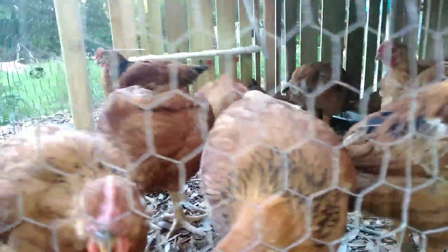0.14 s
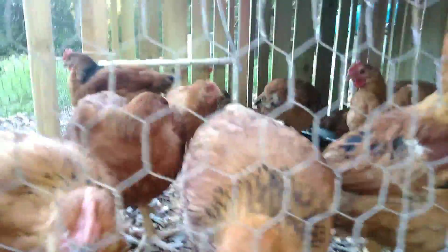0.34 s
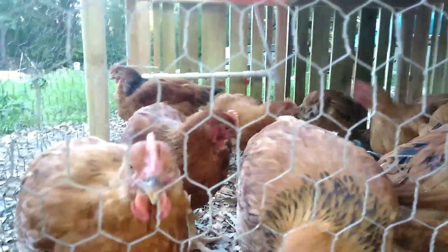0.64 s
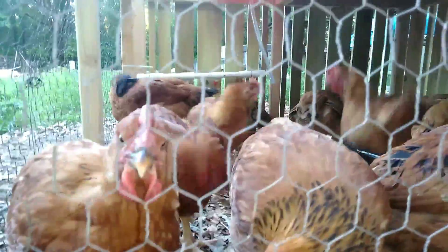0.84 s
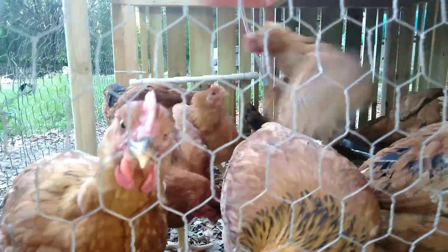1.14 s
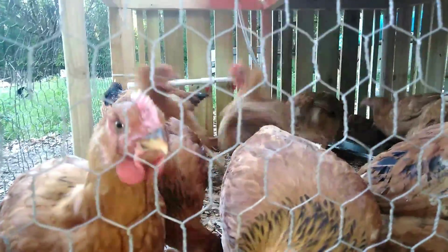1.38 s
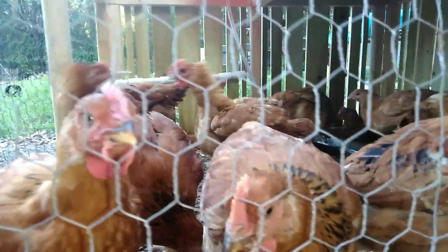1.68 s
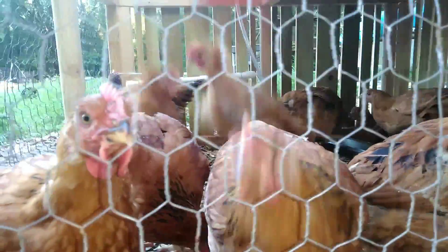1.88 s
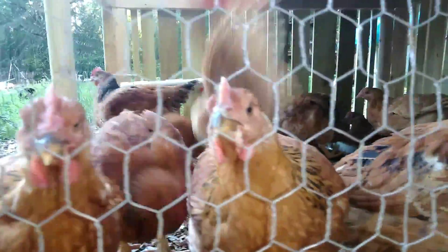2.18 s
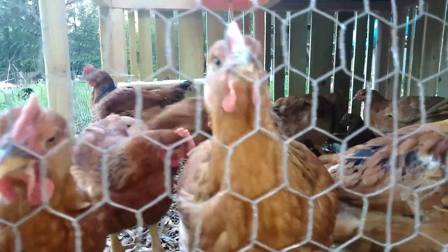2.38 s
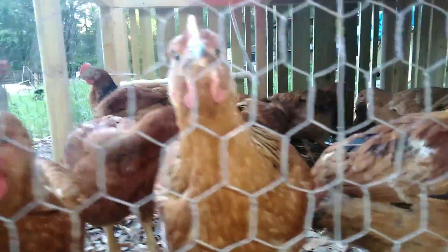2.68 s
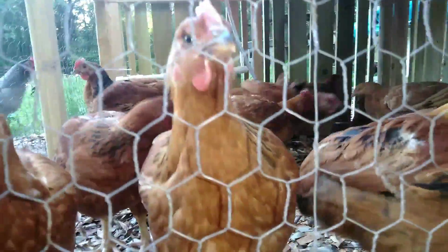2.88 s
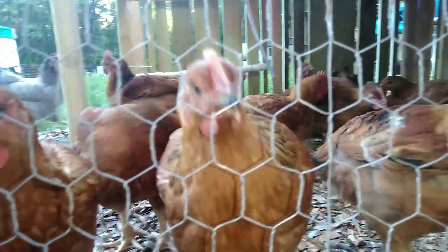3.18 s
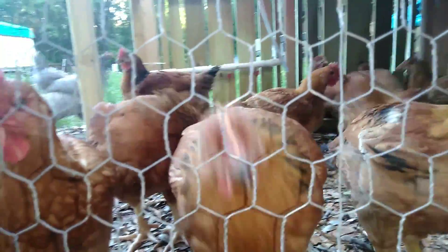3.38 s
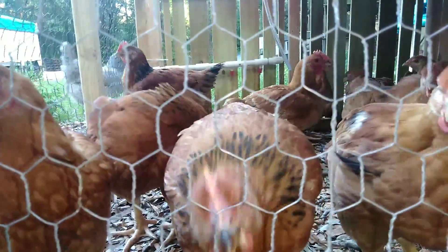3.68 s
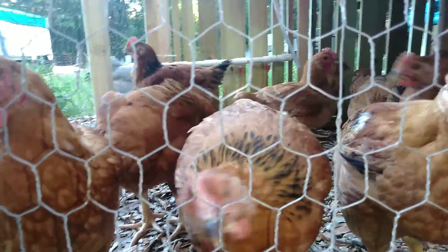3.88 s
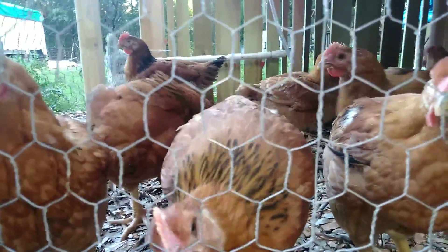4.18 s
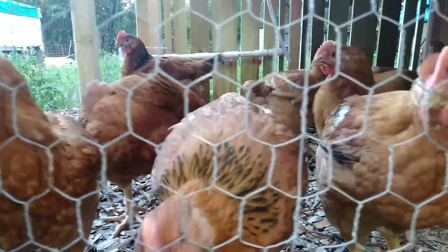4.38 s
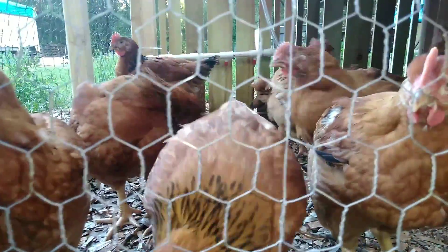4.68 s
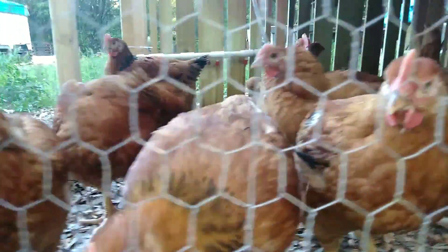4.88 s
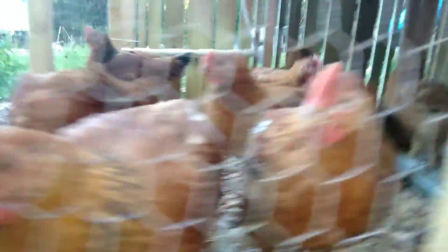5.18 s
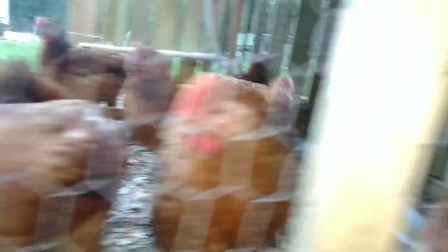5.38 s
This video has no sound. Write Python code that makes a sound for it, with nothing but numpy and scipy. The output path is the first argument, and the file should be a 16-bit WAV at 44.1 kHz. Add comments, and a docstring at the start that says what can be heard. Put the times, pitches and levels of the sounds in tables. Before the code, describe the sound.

From the start, young hens scratch and peck in dry wood chips close to the microphone, making irregular, bright crackles and small snaps. Faint short clucks and thin, gliding peeps come in between, over a quiet distant hum and hiss outdoors. From about 1.2 to 1.5 seconds a bird flaps its wings, with low puffs of air, a loud scatter of chips and soft thuds of feet. The peeps and clucks then grow louder and more frequent. They are loudest from about 2.7 to 3.5 seconds, with brief rough squawks around 3 seconds and another near 4 seconds. Smaller wing puffs come at about 2.3 and 3.3 seconds. Peeping stays busy until it fades near 5 seconds, while scratching and pecking continue to the end, with a soft thud at about 5.5 seconds. The wooden pen adds a very short, slight echo.

```python
"""Young hens in a slatted, wire-fronted pen outdoors, a phone microphone close to the mesh.
From the start, over a distant hum, feet and beaks throw and snap dry wood chips; throats pulse in faint
clucks and whistle thin peeps. Just after 1 s wings push air at the microphone and feet thud on the ground.
The calls grow louder, with a few rough squawks, are loudest around 3 s and fade near 5 s while the
scratching goes on. Slats and roof give the birds a brief echo throughout."""
import sys
import numpy as np
from scipy import signal
from scipy.fft import rfft, irfft
from scipy.io import wavfile
from scipy.ndimage import uniform_filter1d

SR = 44100
rng = np.random.default_rng(int(sys.argv[2]) if len(sys.argv) > 2 else 0)


def inscribe(sig):
    """Save sig as 16-bit PCM at rate SR to the path in sys.argv[1].

    A 1-D sig is mono; a 2-D sig holds one channel per row.
    Samples are clipped to [-1, 1] before scaling.
    """
    pcm = np.round(np.clip(np.atleast_2d(sig).T, -1, 1) * 32767)
    wavfile.write(sys.argv[1], SR, pcm.astype(np.int16))


N = 244314

# distant hum and hiss of the yard: (frequency [Hz], relative level [dB])
YARD_SPECTRUM = [(20, 4.5), (80, 18), (110, 10), (306, -4), (1410, -13), (2920, -9), (4680, -23.5),
                 (6720, -9), (11400, -31.5), (15500, -21.5)]
# bright crackle of chips, sharpened by the microphone's resonance near 11.3 kHz:
# (frequency [Hz], relative level [dB])
CRACKLE_SPECTRUM = [(2500, -34), (4500, -17.5), (7000, -8.5), (9000, -4), (11300, 5), (13000, -3),
                    (15500, -9.5)]
# duller body under that crackle: (frequency [Hz], relative level [dB])
BODY_SPECTRUM = [(120, -25.5), (350, 0), (1000, 5.5), (2500, 7), (4500, 2), (7000, 1.5)]
# the flock shuffling between strokes: (time [s], crackle level [dB])
FLOCK_SHUFFLE = [(0.0, -98), (0.15, -52), (0.37, -68.5), (0.99, -70), (1.39, -80), (1.56, -48), (1.69, -78),
                 (1.77, -45), (1.81, -96), (1.97, -60), (2.1, -47), (2.7, -49.5), (2.95, -43.5), (3.6, -51),
                 (3.64, -64.5), (3.8, -69), (4.2, -52.5), (4.49, -52.5), (4.78, -68), (5.11, -73),
                 (5.42, -80), (5.54, -76)]
# foot scrapes and wing strokes that swell before they peak:
# (peak time [s], crackle level [dB], body against crackle [dB], fall to a tenth [ms])
SCRAPE_STROKES = [(.005, -39, -40, 71), (0.186, -35, -18.5, 24), (0.224, -31.5, -16.5, 13),
                  (1.168, -39, -43, 136), (1.465, -26.5, -13.5, 24), (1.488, -30.5, -7, 21),
                  (1.591, -44, -21, 12), (2.103, -26.5, -18.5, 28), (2.242, -25, -13, 46),
                  (2.281, -23.5, -9, 22), (2.431, -28, -23.5, 17), (2.5, -29, -12, 67),
                  (2.699, -34.5, -8.5, 46), (2.934, -24, -7.5, 41), (3.061, -30, -9, 42),
                  (3.517, -34, -44, 23), (4.517, -30.5, -12.5, 23), (4.691, -40, -32, 21),
                  (4.731, -37.5, -12.5, 69)]
# pecks and kicks that strike the litter at once:
# (peak time [s], crackle level [dB], body against crackle [dB], fall to a tenth [ms])
PECK_STROKES = [(0.262, -33, -17, 58), (0.64, -37, -23, 33), (0.943, -42.5, -6.5, 20),
                (0.981, -33, -18.5, 40), (1.306, -33.5, -12, 240), (1.36, -19.5, -9.5, 28),
                (1.381, -20.5, -15, 12), (1.437, -41, -32, 12), (1.505, -30, -7.5, 22),
                (1.642, -29.5, -6.5, 27.5), (1.701, -33, -3.5, 60), (1.926, -40.5, -15.5, 300),
                (1.97, -34.5, -11, 107), (2.14, -33.5, -12, 88), (2.197, -28.5, -18.5, 65),
                (2.596, -32.5, -24, 27), (2.745, -27, -16, 36), (2.821, -37.5, 7, 210), (2.9, -28, -1, 88),
                (3.224, -34, -29, 13), (3.245, -44, 20.5, 2.8), (3.449, -32.5, -18, 85),
                (3.678, -25, -25, 46), (3.83, -38.5, -7, 44), (3.889, -32.5, -4.5, 42),
                (4.172, -26.5, -18, 25), (4.242, -30.5, -17, 80), (4.798, -34.5, -25, 25),
                (4.922, -45.5, -23, 56), (4.955, -32, -31.5, 23), (4.979, -37, -42.5, 140),
                (5.11, -42.5, -15, 112), (5.345, -37.5, -21, 65), (5.482, -32.5, -21.5, 82)]
# short clucks: (start [s], length [s], pitch [Hz], mouth resonance [Hz], level [dB])
CLUCK_CALLS = [(0.091, 0.024, 581, 1140, -66), (0.288, 0.018, 480, 1000, -62), (0.47, 0.028, 318, 500, -70),
               (0.645, 0.041, 301, 527, -66.5), (1.405, 0.011, 597, 1320, -51.5),
               (1.497, 0.012, 464, 930, -51.5), (1.775, 0.025, 550, 1190, -54.5),
               (2.112, 0.018, 531, 987, -41.5), (2.189, 0.014, 410, 700, -52),
               (2.26, 0.035, 484, 570, -45.5), (2.489, 0.011, 496, 980, -44),
               (2.654, 0.0076, 544, 1020, -53.5), (2.692, 0.012, 558, 1220, -35.5),
               (2.712, 0.0086, 588, 1260, -43), (3.278, 0.0094, 542, 935, -58),
               (3.454, 0.012, 485, 980, -52), (3.834, 0.024, 505, 1920, -50.5),
               (3.888, 0.0048, 487, 590, -54), (4.233, 0.026, 510, 940, -57),
               (4.335, 0.021, 485, 1800, -56), (4.375, 0.026, 763, 820, -66.5),
               (4.664, 0.032, 680, 1400, -56.5), (4.848, 0.015, 463, 720, -52),
               (5.339, 0.016, 536, 1240, -65)]
# drawn-out squawks: (start [s], length [s], pitch [Hz], mouth resonance [Hz], level [dB],
# chest against mouth [dB], rasping edge against mouth [dB], roughness [0-1])
SQUAWK_CALLS = [(1.702, 0.066, 416, 873, -53, -10, -23, 0.3), (2.863, 0.044, 557.5, 1750, -31, 0, -21, 0.6),
                (2.923, 0.054, 554.5, 1480, -58.5, 13, -19, 0.76),
                (3.041, 0.087, 532, 1870, -36, -62, -6, 0.4), (3.923, 0.14, 750, 2295, -36, -59, -28, 0.37)]
# single chips breaking: (time [s], level [dB])
CHIP_SNAPS = [(.2466, -14), (1.3375, -21), (1.3602, -16), (1.644, -19), (2.1031, -19), (3.3382, -24),
              (3.4745, -21), (3.6817, -16), (4.1734, -15), (4.1889, -21), (4.3524, -24), (4.5292, -23),
              (5.344, -23)]
# whistled peeps: (start [s], length [s], first pitch [Hz], middle pitch [Hz], last pitch [Hz], level [dB])
PEEP_CALLS = [(0.385, 0.091, 4120, 2870, 2560, -56), (0.72, 0.057, 2570, 2870, 2380, -60),
              (1.111, 0.077, 3090, 2720, 2470, -62.5), (1.407, 0.039, 1435, 2610, 3450, -44.5),
              (1.497, 0.036, 3210, 2490, 2080, -41), (1.511, 0.034, 1827, 1804, 1775, -40),
              (1.722, 0.061, 3230, 2855, 2020, -40), (2.119, 0.025, 2990, 3880, 4270, -42),
              (2.248, 0.14, 2950, 3850, 3260, -52), (2.383, 0.026, 3240, 2400, 2080, -56),
              (2.49, 0.1, 3600, 3324, 3770, -38), (2.621, 0.12, 3330, 2910, 2580, -50),
              (2.666, 0.059, 4170, 3474, 3450, -33.5), (2.839, 0.035, 4150, 4060, 3920, -37),
              (3.02, 0.08, 2084, 3245, 3480, -35.5), (3.063, 0.1, 2800, 3120, 3000, -39.5),
              (3.291, 0.029, 3860, 3900, 3500, -37.5), (3.319, 0.024, 3250, 2540, 2820, -35.5),
              (3.339, 0.071, 3520, 2520, 2094, -35), (3.46, 0.017, 2580, 3880, 4670, -41),
              (3.469, 0.046, 4510, 2720, 2637, -33.5), (3.651, 0.052, 2220, 2890, 4320, -58),
              (3.744, 0.06, 2830, 2490, 2420, -59.5), (3.844, 0.067, 2245, 2900, 4700, -46.5),
              (3.895, 0.098, 2374, 2364, 2140, -39.5), (4.073, 0.059, 2190, 3880, 4600, -45),
              (4.174, 0.16, 2380, 2320, 2300, -59), (4.272, 0.059, 1760, 3220, 4600, -41.5),
              (4.346, 0.033, 2950, 3210, 2870, -42), (4.379, 0.074, 2430, 2230, 2300, -56.5),
              (4.42, 0.086, 2142, 2486, 1820, -39), (4.483, 0.051, 2435, 3600, 4740, -44),
              (4.573, 0.095, 2510, 2360, 2380, -61), (4.669, 0.043, 2860, 3030, 2300, -39.5),
              (4.699, 0.05, 2700, 3560, 4700, -46.5), (4.883, 0.034, 1660, 1930, 2180, -50),
              (5.072, 0.05, 4520, 3260, 2960, -60), (5.274, 0.083, 3090, 2370, 2290, -56.5),
              (5.421, 0.033, 2840, 2550, 2170, -60.5)]
# air pushed at the microphone by wings: (time [s], level [dB])
WING_PUFFS = [(1.171, -49), (1.229, -44.5), (1.272, -39), (1.31, -52), (1.349, -31.5), (1.451, -42),
              (2.271, -40), (3.323, -39.5), (3.459, -45.5)]
# feet and bodies meeting the ground: (time [s], level [dB])
GROUND_THUDS = [(1.279, -48.5), (1.311, -50), (1.365, -49), (1.709, -45.5), (1.751, -44), (1.968, -50.5),
                (2.816, -49.5), (3.676, -48), (4.177, -55), (5.476, -45.5)]


def undb(db):
    """Decibels to gain."""
    return 10 ** (np.asarray(db) / 20)


def unit(x):
    """Scale to rms 1."""
    return x / np.sqrt(np.mean(x ** 2) + 1e-20)


def colour(x, points):
    """Shape a signal by (frequency [Hz], level [dB]) points; rms 1."""
    hz, db = np.transpose(points)
    bins_hz = np.maximum(np.fft.rfftfreq(len(x), 1 / SR), 1)
    gain = undb(np.interp(np.log(bins_hz), np.log(hz), db))
    return unit(irfft(rfft(x) * gain, len(x)))


def walk(n, rate_hz):
    """Random levels held 1 / rate_hz seconds and smoothed twice; spread near 1."""
    hold = max(int(SR / rate_hz), 1)
    steps = np.repeat(rng.standard_normal(n // hold + 1), hold)
    return 1.3 * uniform_filter1d(uniform_filter1d(steps, hold), hold)[:n]


def add(out, start_s, x):
    """Mix x into out from start_s on."""
    i = int(start_s * SR)
    out[i:i + len(x)] += x[:len(out) - i]


def ring(x, hz, width_hz):
    """One resonance, gain 1 at its centre."""
    return signal.lfilter(*signal.iirpeak(hz, hz / width_hz, fs=SR), x)


def yard(level_db=-65):
    """Hum and hiss far beyond the pen; the bass swells slowly."""
    far = colour(rng.standard_normal(N), YARD_SPECTRUM)
    bass = signal.sosfilt(signal.butter(2, 160, fs=SR, output="sos"), far)
    swell = undb(2 * walk(N, 1.2))
    return undb(level_db) * (far + (swell - 1) * bass)


def chip_clicks(spread_db, smear_s):
    """Dense chip clicks: noise whose size jumps from grain to grain, a few far louder."""
    size = undb(spread_db * rng.exponential(size=N).clip(0, 7))
    tail = np.exp(-np.arange(int(5 * smear_s * SR) + 1) / (smear_s * SR))
    power = signal.fftconvolve(size ** 2, tail)[:N].clip(0)
    return rng.standard_normal(N) * np.sqrt(power)


def litter(peck_rise_ms=6, scrape_rise_ms=31.2, shuffle_body_db=-19, drift_db=3):
    """Strokes and shuffling throw chips: a crackle the microphone's resonance sharpens, a duller body."""
    t = np.arange(N) / SR
    crackle_power = undb(2 * np.interp(t, *np.transpose(FLOCK_SHUFFLE)))
    body_power = crackle_power * undb(2 * shuffle_body_db)
    strokes = [(*row, peck_rise_ms) for row in PECK_STROKES]
    strokes += [(*row, scrape_rise_ms) for row in SCRAPE_STROKES]
    for peak_s, db, body_db, fall_ms, rise_ms in strokes:
        rise_s, fall_s = rise_ms / 1000, fall_ms / 1000
        span = slice(max(int((peak_s - rise_s) * SR), 0), int((peak_s + .5) * SR))
        age = t[span] - peak_s
        swell = np.clip(1 + age / rise_s, 0, 1) ** 3
        # most chips land at once, a few keep trickling for longer
        landing = undb(-40 * np.maximum(age, 0) / fall_s)
        trickle = landing ** .25
        crackle_power[span] += undb(2 * db) * swell * (0.7 * landing + 0.014 * trickle)
        body_power[span] += undb(2 * (db + body_db)) * swell * (0.95 * landing + 0.019 * trickle)
    spectrum = rfft(colour(chip_clicks(spread_db=5.0, smear_s=0.001), CRACKLE_SPECTRUM))
    body = colour(chip_clicks(spread_db=2.0, smear_s=0.0055), BODY_SPECTRUM)
    # each band of the crackle flickers on its own
    hz, edges_hz = np.fft.rfftfreq(N, 1 / SR), (1500, 6000, 9500, 12200, 16000)
    crackle = sum(irfft(spectrum * (hz >= lo) * (hz < hi), N) * undb(drift_db * walk(N, 25.042))
                  for lo, hi in zip(edges_hz, edges_hz[1:]))
    return np.sqrt(crackle_power) * crackle + np.sqrt(body_power) * body


def throat_pulses(n, pitch_hz, rough, throb_hz=57.3):
    """A hen's throat pulses throb in size; the pitch wavers and each period slips a little."""
    slip, size_jitter, drift = rng.standard_normal((150, 3)).T
    throb = np.cos(2 * np.pi * throb_hz * np.cumsum(1 + .5 * walk(SR // 4, 60)) / SR - 2)
    waver = uniform_filter1d(drift, size=8)
    periods = SR / pitch_hz * np.exp(rough * (0.13 * slip + 0.4 * waver))
    onsets = np.cumsum(periods).astype(int)
    onsets -= onsets[0]
    onsets = onsets[onsets < n]
    size_db = rough * (4.2 * size_jitter[:len(onsets)] + 8 * throb[onsets])
    pulses = np.zeros(n + SR // 50)
    pulses[onsets] = undb(size_db) * np.sin(np.pi * (onsets + 30) / (n + 60)) ** 0.23
    return pulses


def clucks_and_squawks(cluck_chest_db=-13.5, cluck_edge_db=-36, cluck_rough=0.56):
    """Throat pulses ring the mouth, windpipe and chest; in rough calls the mouth rings wider."""
    out = np.zeros(N)
    clucks = [(*row, cluck_chest_db, cluck_edge_db, cluck_rough) for row in CLUCK_CALLS]
    for start_s, length_s, pitch_hz, mouth_hz, db, chest_db, edge_db, rough in clucks + SQUAWK_CALLS:
        n = int(length_s * SR)
        pulses = throat_pulses(n, pitch_hz, rough)
        width_hz = mouth_hz * (0.16 + 0.85 * rough)
        mouth = ring(ring(pulses, mouth_hz, width_hz), mouth_hz, 0.89 * width_hz)
        windpipe = 0.053 * ring(ring(pulses, 2800, 1400), 3300, 2200)
        # the open beak radiates little below its own resonance; its upper rings add a rasping edge
        low_cut = signal.butter(4, 0.66 * mouth_hz, "high", fs=SR, output="sos")
        beak = unit(signal.sosfilt(low_cut, mouth - windpipe))
        edge = undb(edge_db) * unit(sum(ring(pulses, hz, 500) for hz in (4200, 5200, 6500)))
        chest = undb(chest_db) * unit(ring(ring(pulses, 700, 1000), 830, 1200))
        add(out, start_s, undb(db) * (beak - chest + edge) * np.sqrt(len(pulses) / n))
    return out


def snaps(ring_hz=11500, rise_ms=.15):
    """A chip breaks: a click that rings for a moment in the treble."""
    out, t = np.zeros(N), np.arange(SR // 200) / SR
    age = t * 1000 / rise_ms
    click = np.sin(2 * np.pi * ring_hz * t) * age * np.exp(1 - age)
    for start_s, db in CHIP_SNAPS:
        add(out, start_s, undb(db) * click)
    return out


def peep_glide(n, pitches_hz, step_ms=11):
    """A peep moves through its first, middle and last pitch in small, rounded steps."""
    glide = np.interp(np.arange(n) / n, [0, .5, 1], pitches_hz)
    glide = uniform_filter1d(glide, n // 4, mode="nearest")
    step = int(step_ms * SR / 1000)
    step_centres = ((np.arange(n) // step + .5) * step).astype(int).clip(0, n - 1)
    return uniform_filter1d(glide[step_centres], SR // 250, mode="nearest")


def peeps(base_rough=.44, rough_per_octave=.3, buzz_hz=620):
    """A gliding whistle; roughness shakes pitch and level, and the throat's buzz adds tones beside it."""
    out = np.zeros(N)
    for start_s, length_s, first_hz, mid_hz, last_hz, db in PEEP_CALLS:
        n = int(length_s * SR)
        # climbing peeps are hoarser
        rough = np.clip(base_rough + rough_per_octave * np.log2(last_hz / first_hz), .1, 1)
        jitter, shimmer, breath_sin, breath_cos, buzz_drift = (
            walk(SR // 4, rate_hz)[:n] for rate_hz in (149.4, 123, 888, 882, 300))
        hz = peep_glide(n, [first_hz, mid_hz, last_hz])
        phase = 2 * np.pi * np.cumsum(hz * (1 + 0.086 * rough * jitter)) / SR
        breath = breath_sin * np.sin(phase) + breath_cos * np.cos(phase)
        buzz = 2 * np.pi * buzz_hz * np.cumsum(1 + 0.24 * buzz_drift) / SR
        rasp = 0.3 * (np.sin(phase + buzz) + np.sin(phase - buzz) + .5 * np.sin(phase + 2 * buzz))
        octave = .08 * breath_sin * np.sin(2 * phase)
        voice = (1 - rough) * np.sin(phase) + rough * (breath + rasp + octave)
        voice *= (hz / hz.min()) ** -2  # the whistle thins as it climbs
        voice *= undb(7 * rough * shimmer)
        envelope = np.sin(np.pi * np.arange(n) / n) ** 0.6
        add(out, start_s, undb(db) * envelope * unit(voice))
    return out


def wing_puffs(swing_hz=42):
    """Each wing stroke sends a slow pressure swing and a low whoosh past the microphone."""
    out, t = np.zeros(N), np.arange(SR // 8) / SR
    swing = np.sin(2 * np.pi * swing_hz * t)
    envelope = (t / 0.029) * np.exp(1 - t / 0.011)
    for start_s, db in WING_PUFFS:
        whoosh = unit(ring(rng.standard_normal(len(t)), hz=55, width_hz=53))
        add(out, start_s, undb(db) * (swing + 0.5 * whoosh) * envelope)
    return out


def thuds(centre_hz=212, width_hz=210, decay_s=0.014):
    """Feet and bodies land on the ground: a short low burst, soft at both ends."""
    out, age = np.zeros(N), np.arange(SR // 8) / SR / decay_s
    for start_s, db in GROUND_THUDS:
        noise = rng.standard_normal(len(age))
        burst = unit(ring(ring(noise, centre_hz, width_hz), centre_hz, width_hz))
        add(out, start_s, undb(db) * burst * np.sqrt(age) * np.exp(-age))
    return out


def pen_echo(direct, t60_s=0.11, echo_db=-17):
    """Slats and roof scatter echoes that reach the microphone just after the direct sound, and duller."""
    t = np.arange(SR // 3) / SR
    echo = rng.standard_normal(len(t)) * (t > .004) * np.exp(-t * np.log(1000) / t60_s)
    echo = signal.sosfilt(signal.butter(1, 7000, fs=SR, output="sos"), echo)
    return direct + undb(echo_db) * signal.fftconvolve(direct, echo / np.linalg.norm(echo))[:N]


def scene():
    """Mono, at the mesh: the birds echo inside the pen; wing air and the far yard arrive dry."""
    birds = litter() + snaps() + peeps() + clucks_and_squawks() + thuds()
    return (pen_echo(birds) + wing_puffs() + yard())[None]


def record(dry):
    """The phone at the mesh cuts the treble steeply above 15.6 kHz."""
    return signal.sosfilt(signal.ellip(10, .2, 70, 15600, fs=SR, output="sos"), dry)


dry = scene()
out = record(dry)
inscribe(out)
```